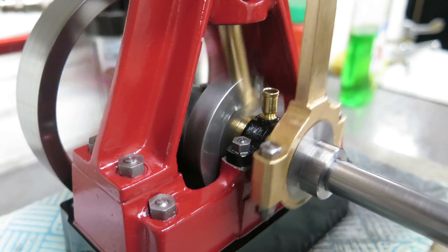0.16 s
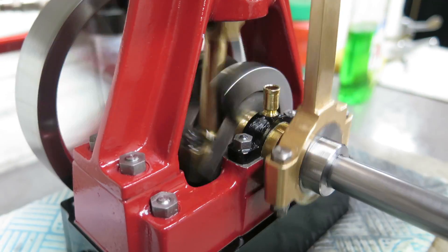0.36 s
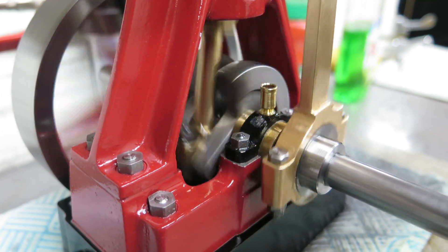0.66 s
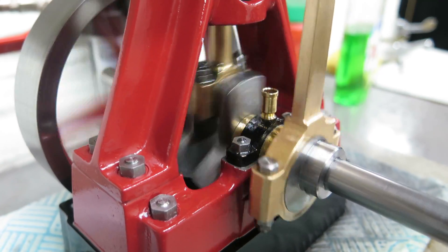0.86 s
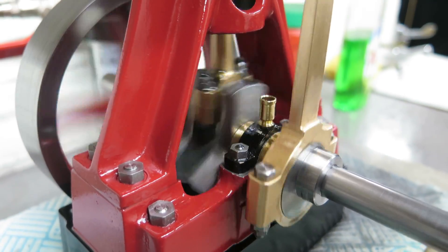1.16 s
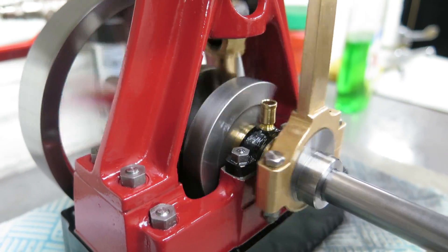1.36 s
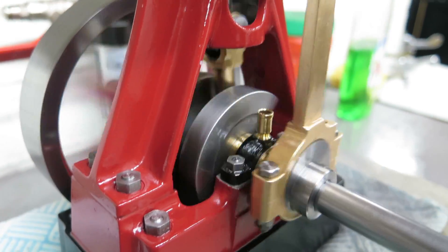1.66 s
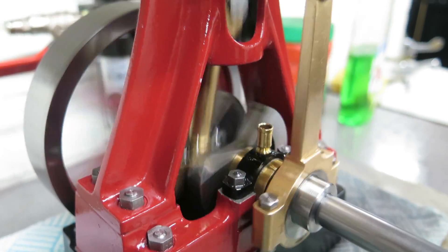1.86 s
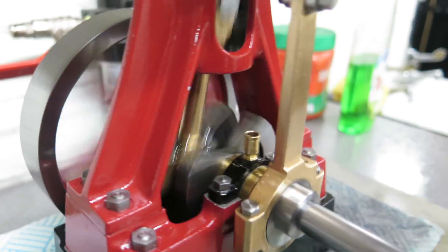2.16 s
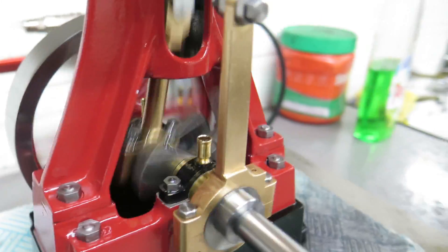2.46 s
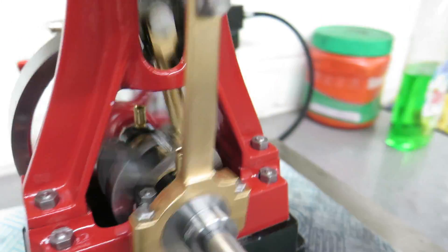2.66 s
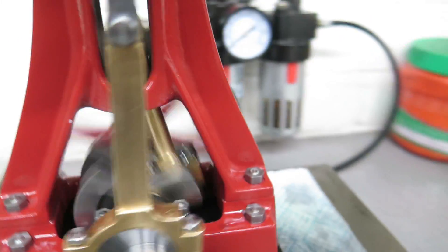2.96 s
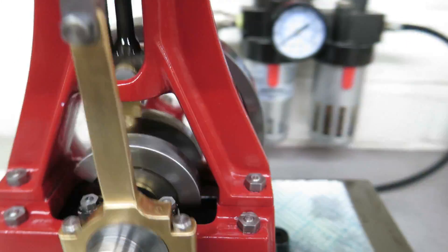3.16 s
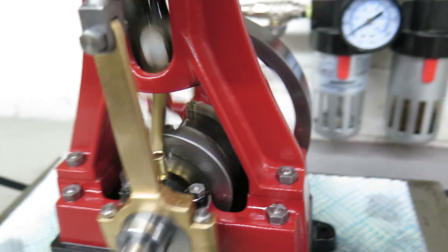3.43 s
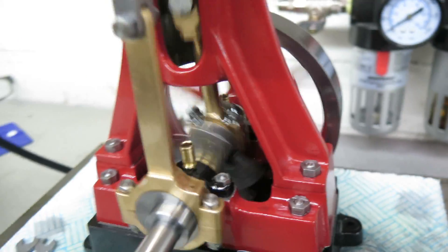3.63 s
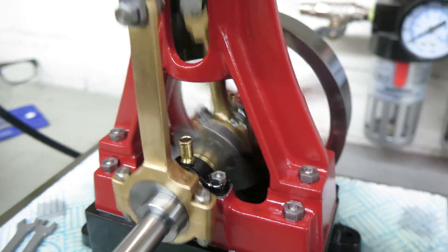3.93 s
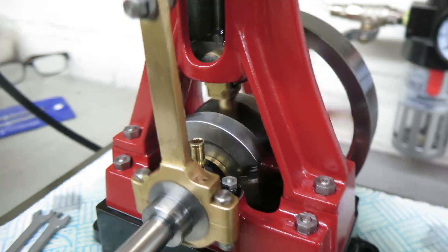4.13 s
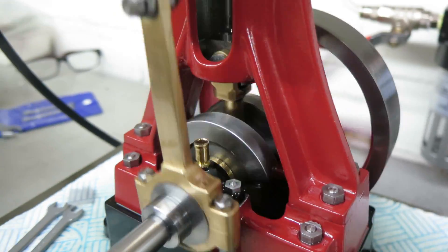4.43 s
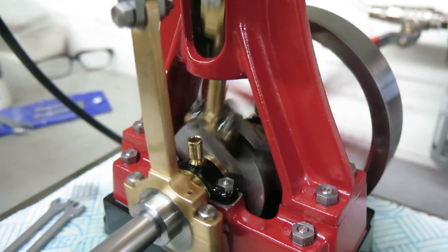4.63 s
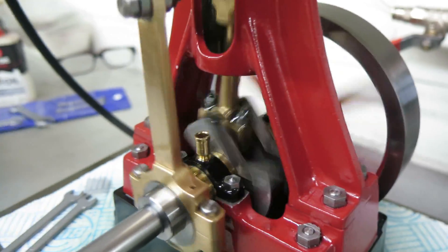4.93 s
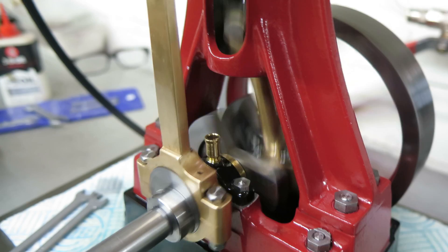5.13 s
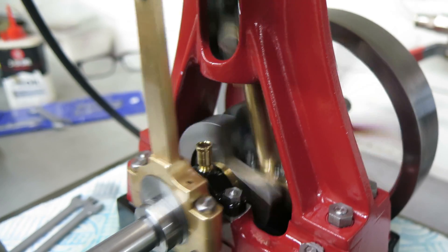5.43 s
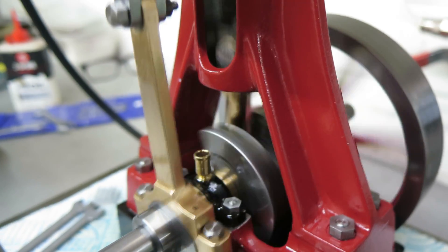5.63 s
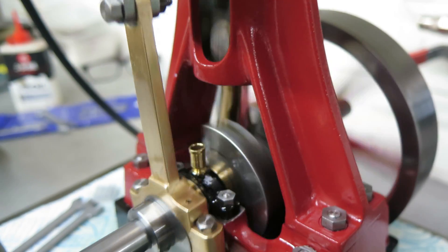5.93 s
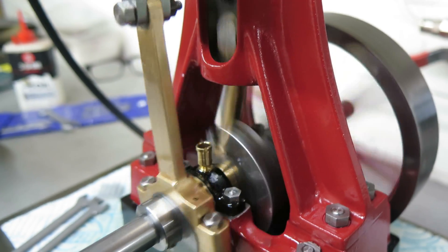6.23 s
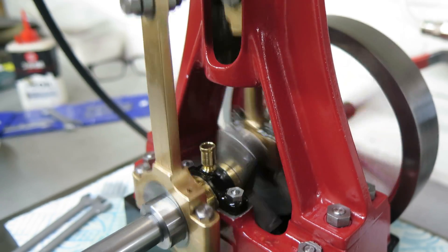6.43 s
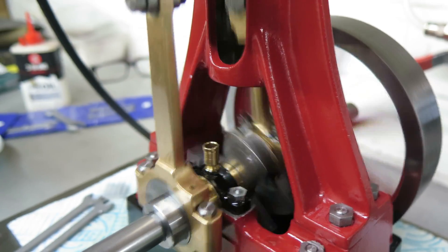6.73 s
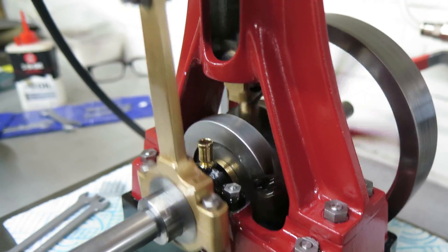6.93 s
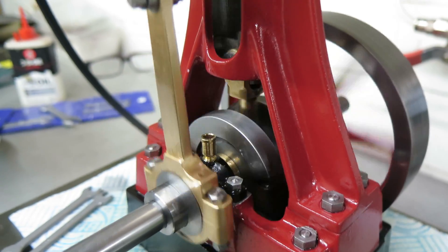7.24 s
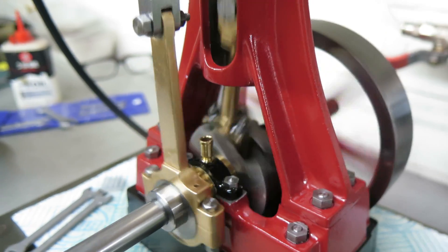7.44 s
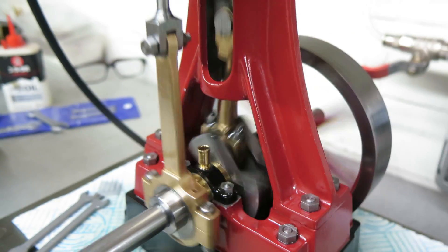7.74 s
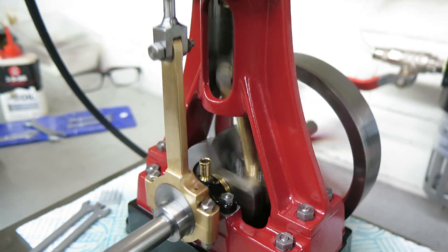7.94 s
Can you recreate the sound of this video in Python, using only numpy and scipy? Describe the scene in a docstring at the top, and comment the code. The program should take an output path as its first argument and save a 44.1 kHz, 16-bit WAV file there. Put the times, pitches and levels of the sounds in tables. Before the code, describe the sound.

Quick, regular chuffing from a little double-acting engine on a bench: hiss, puff, thump, then a softer answer, over and over without stopping. Light metal clatter and ticks ride along, with heavier bearing knocks later. A thin bright air leak and soft room rumble remain constant. Close stereo microphones swing around the machine; distant knocks and a brief low hum belong to the first part, while the second half is nearer and punchier.

```python
"""Workshop bench: a small double-acting steam engine on compressed air, heard close by two moving microphone ports.
Each stroke's spent air hisses (noise through the exhaust resonances), ending in a noise-burst puff and a
thump (low modes pushed twice). The crank bearing and linkage strike frame modes, with noise ticks; the valve rod clicks.
Behind: a steady supply leak (resonant noise), dull knocks further off, a wavering low hum and
workshop rumble (noise bands). Gain control and treble loss act on the sum."""
import sys
import numpy as np
from scipy import signal
from scipy.fft import rfft, irfft, next_fast_len
from scipy.io import wavfile
from scipy.ndimage import uniform_filter1d

SR = 44100
rng = np.random.default_rng(int(sys.argv[2]) if len(sys.argv) > 2 else 0)


def persist_wave(psi):
    """Save psi, clipped to +-1, as 16-bit WAV."""
    counts = np.round(np.clip(psi, -1, 1) * 32767).astype(np.int16)
    wavfile.write(sys.argv[1], SR, np.atleast_2d(counts).T)


N = 356971

# Levels in dB are relative unless stated; several contributions add up.
# Workshop rumble spectrum. Each row: frequency in Hz, density in dB per Hz.
RUMBLE_SPECTRUM = [(13, -38), (22, -9), (40, -7), (110, -4), (220, -11), (434, -17.5), (533, -17.5),
                   (790, -24), (2070, -28), (3900, -42)]
# Rumble likeness. Each row: frequency in Hz, left-right correlation.
RUMBLE_LIKENESS = [(30, .998), (60, 0.98), (150, 0.97), (350, 0.15), (700, 0.21), (1500, 0.52)]
# Low hum. Each row: time in seconds, frequency in Hz, mean level in dB.
HUM_TRACK = [(1.86, 92.4, -62), (1.9, 88, -30.5), (2.15, 96.8, -40), (2.4, 103.4, -39), (2.7, 106.4, -33.5),
             (2.9, 105.5, -43), (3.3, 108, -43)]
# Supply leak resonances. Each row: frequency in Hz, width in Hz, level in dB.
LEAK_RESONANCES = [(2730, 600, -26), (4280, 1760, 4.5), (7270, 1340, 5), (9880, 260, 11), (10940, 140, 15),
                   (12450, 3500, 5.5), (14670, 890, 7)]
# Leak level. Each row: time in seconds, mean level in dB.
LEAK_LEVEL_TRACK = [(0, -42.5), (2.8, -43), (3.4, -38), (4.1, -42), (4.6, -42), (8.1, -42.5)]
# Far knocks. Each row: time in seconds, level in dB.
FAR_KNOCK_EVENTS = [(0.475, -31.5), (0.733, -30.5), (0.973, -31.5), (1.32, -30.5), (1.621, -29.5),
                    (1.917, -31.5), (2.202, -29), (2.474, -30), (2.748, -28.5)]
# Hollow body knocked far off. Each row: frequency in Hz, width in Hz, level in dB.
FAR_BODY_RESONANCES = [(191, 75, 6), (363, 100, -3.5), (551, 48, 0.5), (755, 43, 1.5), (912, 36, -4.5)]
# Crank at the upper end of stroke, speed wandering. Each row: time in seconds, turns made.
CRANK_TURNS = [(.0447, 0), (1.2872, 4), (2.214, 7), (3.4567, 11), (4.7024, 15), (5.3284, 17), (6.26, 20),
               (7.1937, 23), (8.131, 26)]
# Exhaust as the ports come nearer. Each row: time in seconds, upper hiss in dB, upper puff over hiss in dB.
NEARNESS_TRACK = [(0, -31, 8), (1, -32, 7.5), (1.6, -33, 8.5), (2.2, -35, 8.5), (2.85, -33.5, 10),
                  (3.15, -30, 12.5), (3.45, -26, 11.5), (4.1, -27, 12), (4.7, -25, 10.5), (5.9, -23, 11.5),
                  (7.2, -24, 11), (8.1, -26.5, 7.5)]
# Extra take-ups of crank bearing slack, some mostly knock, some mostly tick, added to the every-turn ones.
# Each row: time in seconds, knock in dB, tick in dB.
SLACK_EVENTS = [(0.198, -51, -25), (1.748, -34, -25.5), (3.299, -35, -32), (3.612, -28, -27),
                (4.546, -26, -27), (5.48, -19, -28), (5.791, -26, -44.5), (6.102, -27, -38),
                (6.723, -19.5, -43), (7.036, -35, -44), (7.347, -22, -30), (7.973, -39, -19)]
# Lighter linkage contacts, every turn. Each row: mean lag from the upper end in seconds, level in dB.
LINKAGE_CONTACTS = [(-.028, -34), (.095, -40), (.113, -31)]
# Frame modes. Each row: frequency in Hz, level in dB, t60 in seconds.
FRAME_MODES = [(409, 3, 0.034), (510, 3.5, 0.072), (547, 0.5, 0.053)]
# Valve rod modes. Each row: frequency in Hz, level in dB, t60 in seconds.
VALVE_MODES = [(1470, -1.5, 0.0068), (3460, -2.5, .006)]
# Pipe and bench modes. Each row: frequency in Hz, level in dB, t60 in seconds.
BENCH_MODES = [(61.3, -28, 0.069), (100.4, -1.5, 0.11), (139.6, 2.5, 0.099)]
# Air column pushes at each end. Each row: lag from the end in seconds, level in dB, length in seconds.
AIR_PUSHES = [(-.008, -3, .007), (.0058, 0, .006)]
# Exhaust passage resonances. Each row: frequency in Hz, width in Hz, upper hiss, lower hiss, puff in dB.
PASSAGE_RESONANCES = [(515, 126, -7, -5, -12), (1266, 537, -4, -2.5, -4.5), (1408, 296, 4, 2, -0.5),
                      (1582, 500, -5.5, -6, -10), (2731, 142, -0.5, 5, 0.5),
                      (3280, 280, -12.5, -5.5, -13.5), (4318, 256, -6.5, -3.5, -3),
                      (5032, 86, -0.5, 3.5, 4), (5750, 790, -21, -13, -11.5), (6978, 89, -3.5, 0, 3.5),
                      (8350, 1600, -16, -11.5, -8.5), (9130, 285, -3.5, 0.5, 4.5), (11220, 750, -8, -4, 8),
                      (12970, 1600, -26, -9, -1), (12900, 170, -13, -6, -59), (13900, 2600, -24, -92, -7)]
# Exhaust port, upper row then lower. Each row: opening in seconds before the end,
# full flow in seconds before the end, sag in dB at SAG_S after full flow.
PORT_TIMING = [(.107, 0.053, 2.5), (.132, 0.077, 7.5)]
# Cylinder resonances, rising as the piston sweeps it empty. Each row: end (0 upper, 1 lower),
# first frequency in Hz, last frequency in Hz, width in Hz, level over the flow in dB.
CYLINDER_RESONANCES = [(0, 5400, 6150, 120, -15), (0, 7950, 8400, 150, -21), (1, 1500, 1780, 80, -8),
                       (1, 5250, 5800, 120, -16)]
# Where the ports point. Each row: time in seconds, treble in dB, exhaust left-right in dB,
# low ring lift in dB, middle ring lift in dB.
PORT_VIEW = [(0, -9.5, 0, 3.5, 5), (2.399, -0.5, -0.5, 6.5, 7.5), (2.9, -5, -2.5, -6, 11),
             (3.6, -5.5, -0.5, -2.5, 6.5), (4.202, -5, -1.5, -1.5, 3.5), (5.5, -7.5, -2, -3, 3),
             (8.1, -5.5, -1.5, -6, 1)]
# Phase between the ports. Each row: frequency in Hz, left's lead in radians (negative: lags).
PHASE_LEAD = [(0, 0), (5500, -.75), (7500, -2.3), (16000, -2.6)]

RUMBLE_RMS_DB = -35.5
LEAK_SWING_DB, LEAK_LEAST_TURN = 2, 0.3  # less hiss while little air is drawn, twice a turn
RATTLE_PER_S = 600  # mean contact rate within a far knock
LOWER_AFTER_UPPER_S = 0.162  # upper end of stroke to the lower
LOWER_HISS_DB, LOWER_PUFF_DB, LOWER_THUMP_DB = -6, -4.5, -4.5  # re upper hiss, upper hiss, upper thump
THUMP_DB, THUMP_FOLLOWS = -25, 0.81  # at mean nearness; share of the hiss's dB swing
SLACK_BEFORE_LOWER_S, SLACK_KNOCK_DB, SLACK_TICK_DB = 0.00932, -6.5, -42  # every turn; knock re upper hiss
VALVE_DB, LINKAGE_JITTER_S = -29, 0.0061
SWEEP_S = 0.105  # cylinder pitch rise, ending with the stroke
SAG_S = 0.05  # flow sag grows with time squared
SWIRL_DB, SWIRL_PER_S = 2.0, 25  # spread and rate of each hiss resonance's wander
OPENING_POWER, SHUT_BEFORE_END_S, SHUT_S = 1.25, 0.0072, 0.01  # port flow rise exponent; closing
PUFF_RISE_S, PUFF_RISE_POWER, PUFF_T60_S = 0.0094, 1.42, 0.039
PUFF_TAIL_DB, PUFF_TAIL_T60_S = -13, 0.13
MIC_DROOP_HZ, CUTOFF_HZ = 14900, 16200
DUCK_ABOVE_DB, DUCK_RATIO = -16, 0.58  # threshold; share of the excess taken off
HELD_FALL_DB_PER_S = 49  # fall of the held level that sets the ducking


def amp(db):
    """Decibels to amplitude."""
    return 10 ** (np.asarray(db) / 20)


def rms_one(x):
    """Scale to RMS 1."""
    return x / np.sqrt(np.mean(x ** 2) + 1e-20)


def at_hz(points, hz):
    """Interpolate (Hz, value) rows over log frequency."""
    points_hz, values = np.transpose(points)
    return np.interp(np.log(hz), np.log(np.maximum(points_hz, 1)), values)


def drift(rate_hz):
    """Noise through two equal real poles at rate_hz, RMS 1."""
    r = np.exp(-2 * np.pi * rate_hz / SR)
    settled = signal.lfilter([1], [1, -2 * r, r * r], rng.standard_normal(N + SR))[SR:]
    return rms_one(settled)


def resonate(x, resonances):
    """Parallel resonances (Hz, width Hz, dB), signs alternating."""
    out = 0
    for k, (hz, width_hz, db) in enumerate(resonances):
        r = np.exp(-np.pi * width_hz / SR)
        zeros = [(1 - r * r) / 2, 0, (r * r - 1) / 2]
        poles = [1, -2 * r * np.cos(2 * np.pi * hz / SR), r * r]
        out = out + (-1) ** k * amp(db) * signal.lfilter(zeros, poles, x + 1e-18)
    return out


def strike(times_s, levels_db, modes, contact_s, spread_db):
    """Blows softened by a unit-area contact ring decaying modes (Hz, dB, t60 s), each at a random strength."""
    out = np.zeros(N)
    at = np.minimum((np.asarray(times_s) * SR).astype(int), N - 1)
    scatter = rng.standard_normal((len(at), len(modes)))
    for k, (hz, db, t60_s) in enumerate(modes):
        clicks = np.zeros(N)
        np.add.at(clicks, at, amp(levels_db + db + spread_db * scatter[:, k]))
        r, w = amp(-60 / (t60_s * SR)), 2 * np.pi * hz / SR
        out += signal.lfilter([0, np.sin(w)], [1, -2 * r * np.cos(w), r * r], clicks + 1e-18)
    contact = np.hanning(int(contact_s * SR) + 3)
    return signal.fftconvolve(out, contact / contact.sum())[:N]


def repeat(times_s, levels_db, shape_s, shape_db):
    """Lay one envelope at every time; overlaps add."""
    out, t = np.zeros(N), np.arange(N) / SR
    for s, db in zip(times_s, levels_db):
        near = slice(max(int((s + shape_s[0]) * SR), 0), int((s + shape_s[-1]) * SR))
        out[near] += amp(db + np.interp(t[near] - s, shape_s, shape_db))
    return out


def ports(x, apart_db):
    """Two ports hear row 0 alike and row 1 in opposite sign; left lags and is shaded, more in the treble."""
    size = next_fast_len(N)
    hz = np.fft.rfftfreq(size, 1 / SR)
    half_lead = np.exp(.5j * np.interp(hz, *np.transpose(PHASE_LEAD)))
    turn = half_lead * amp(-hz / 10000)
    left = x[0] + amp(apart_db) * x[1]
    right = x[0] - amp(apart_db) * x[1]
    return np.array([irfft(rfft(left, size) * turn, size), irfft(rfft(right, size) / turn, size)])[:, :N]


def rumble():
    """Half-octave noise bands, each with its own level, slow lumps and left-right correlation."""
    out, edges_hz = 0, 20 * 2 ** np.arange(0, 7.6, .5)
    white = rng.standard_normal((2, 2, N))
    for k, (low_hz, high_hz) in enumerate(zip(edges_hz, edges_hz[1:])):
        band = signal.butter(2, [low_hz, high_hz], "band", fs=SR, output="sos")
        mid, side = signal.sosfilt(band, white[k % 2])  # neighbouring bands use separate noise
        hz = np.sqrt(low_hz * high_hz)
        alike = np.clip(at_hz(RUMBLE_LIKENESS, hz), 0, 1)
        gain = amp(at_hz(RUMBLE_SPECTRUM, hz) + 1.5 * drift(6))
        out = out + gain * (np.sqrt(1 + alike) * mid + np.sqrt(1 - alike) * side * [[1], [-1]])
    return amp(RUMBLE_RMS_DB) * rms_one(out)


def hum():
    """One sine, gliding in pitch and wavering in level."""
    s, hz, db = np.transpose(HUM_TRACK)
    t = np.arange(N) / SR
    level_db = np.interp(t, s, db, -99, -99) + 2.1 * drift(9.9)
    phase = 2 * np.pi * np.cumsum(np.interp(t, s, hz)) / SR
    return np.sqrt(2) * amp(level_db) * np.sin(phase)


def leak():
    """Escaping supply air: resonant noise, its level breathing twice per crank turn."""
    hiss = rms_one(resonate(rng.standard_normal((2, N)), LEAK_RESONANCES))
    t = np.arange(N) / SR
    turns = np.interp(t, *np.transpose(CRANK_TURNS))
    swing = -np.cos(4 * np.pi * (turns - LEAK_LEAST_TURN))
    level_db = np.interp(t, *np.transpose(LEAK_LEVEL_TRACK)) + LEAK_SWING_DB * swing
    return amp(level_db) * ports(hiss, apart_db=-8)


def far_knocks():
    """Hollow body excited by a short rattle of contacts and a room blur that differs on each side."""
    s, db = np.transpose(FAR_KNOCK_EVENTS)
    shared, own = rng.standard_normal((2, N))
    contacts = rms_one(rng.choice([-1, 1], N) * (rng.random(N) < RATTLE_PER_S / SR))
    rattle = repeat(s, db + 15.0, [-.009, -0.0071, 0.0076, 0.016], [-25, -4, 1.5, -25]) * contacts
    blur_envelope = repeat(s, db + 10.5, [-0.0053, 0.0098, 0.043, 0.14], [-20, 0.5, -6.5, -29])
    blur = blur_envelope * (shared + 0.31 * own * [[1], [-1]])
    bare = signal.sosfilt(signal.butter(2, [250, 1400], "band", fs=SR, output="sos"), rattle)
    return amp(-22) * bare + resonate(rattle + blur, FAR_BODY_RESONANCES)


def strokes():
    """Crank timing gives stroke ends, upper and lower in turn: rows of time s, thump, puff and hiss dB."""
    crank_s, turns = np.transpose(CRANK_TURNS)
    upper_s = np.interp(np.arange(turns[-1] + 1), turns, crank_s)
    s = np.transpose([upper_s, upper_s + LOWER_AFTER_UPPER_S]).ravel()[:-1]
    lower = np.arange(len(s)) % 2
    near_s, level_db, over_db = np.transpose(NEARNESS_TRACK)
    hiss_db = np.interp(s, near_s, level_db)
    thump_db = THUMP_DB + THUMP_FOLLOWS * (hiss_db - hiss_db.mean()) + lower * LOWER_THUMP_DB
    puff_db = hiss_db + np.where(lower, LOWER_PUFF_DB, np.interp(s, near_s, over_db))
    return np.array([s, thump_db, puff_db, hiss_db + lower * LOWER_HISS_DB])


def linkage():
    """Slack and linkage blows ring the frame; slack adds noise ticks, the valve rod clicks."""
    ends_s, _, _, hiss_db = strokes()
    upper_s, lower_s = ends_s[::2], ends_s[1::2]
    extra_s, extra_db, extra_tick_db = np.transpose(SLACK_EVENTS)
    s = np.r_[extra_s, lower_s - SLACK_BEFORE_LOWER_S]
    knock_db = np.r_[extra_db, hiss_db[:-1:2] + SLACK_KNOCK_DB]
    tick_db = np.r_[extra_tick_db, SLACK_TICK_DB + 2.5 * rng.standard_normal(len(lower_s))]
    out = strike(s, knock_db - 2.0, FRAME_MODES, contact_s=0.0018, spread_db=2.5)
    for lag_s, db in LINKAGE_CONTACTS:
        contact_at_s = upper_s + lag_s + LINKAGE_JITTER_S * rng.standard_normal(len(upper_s))
        out += strike(np.maximum(contact_at_s, 0), db, FRAME_MODES, contact_s=0.0022, spread_db=2.5)
    out += strike(lower_s + 0.0077, VALVE_DB, VALVE_MODES, contact_s=.0001, spread_db=3.5)
    tick_envelope = repeat(s, tick_db + 8.5, [0, .0004, .004], [-20, 0, -30])
    ticks = tick_envelope * rng.standard_normal((2, N))
    bright = signal.sosfilt(signal.butter(2, 5500, "high", fs=SR, output="sos"), ticks)
    return out + ports(bright, apart_db=-10)


def thumps():
    """Two suction pushes at each end of stroke but the last ring the low pipe and bench modes."""
    s, thump_db = strokes()[:2, :-1]
    out = 0
    for lag_s, db, length_s in AIR_PUSHES:
        out = out - strike(s + lag_s, thump_db + db + 5.5, BENCH_MODES, length_s, spread_db=3.5)
    return out


def port_flow(end):
    """Port opens, flow sags as the cylinder empties, port shuts: (s from the end, dB)."""
    opens_s, full_s, sag_db = PORT_TIMING[end]
    t = np.arange(-opens_s, SHUT_S / 2 - SHUT_BEFORE_END_S, 1 / 2000)
    opening = np.clip((t + opens_s) / (opens_s - full_s), 1e-2, 1)
    rise_db = 20 * OPENING_POWER * np.log10(opening)
    shut_db = 20 * np.log10(np.clip(.5 - (t + SHUT_BEFORE_END_S) / SHUT_S, 1e-2, 1))
    return t, rise_db - sag_db * (np.maximum(t + full_s, 0) / SAG_S) ** 2 + shut_db


def puff_shape():
    """Steep swell, quick fall and a weaker, longer tail: (s from the end, dB)."""
    t = np.arange(-PUFF_RISE_S, PUFF_TAIL_T60_S, 1 / 4000)
    after = np.maximum(t, 0)
    fall = amp(-60 * after / PUFF_T60_S) + amp(PUFF_TAIL_DB - 60 * after / PUFF_TAIL_T60_S)
    rise = np.clip(1 + t / PUFF_RISE_S, 1e-2, 1) ** PUFF_RISE_POWER
    return t, 20 * np.log10(rise * fall)


def swirling(x, resonances):
    """Parallel resonances whose strengths wander independently."""
    t, out = np.arange(N) / SR, 0
    knots_s = np.arange(0, N / SR + 1, 1 / SWIRL_PER_S)
    wander = rng.standard_normal((len(resonances), len(knots_s)))
    for k, resonance in enumerate(resonances):
        gain = amp(SWIRL_DB * np.interp(t, knots_s, wander[k]))
        out = out + (-1) ** k * gain * resonate(x, [resonance])
    return out


def cylinder(end, flow):
    """Emptying cylinder: narrow noise shifted to a rising pitch, one band per resonance of that end."""
    t, ends_s, out = np.arange(N) / SR, strokes()[0, end::2], 0
    to_go_s = ends_s[np.minimum(np.searchsorted(ends_s, t), len(ends_s) - 1)] - t
    swept = np.clip(1 - to_go_s / SWEEP_S, 0, 1)
    for at_end, first_hz, last_hz, width_hz, db in CYLINDER_RESONANCES:
        if round(at_end) == end:
            carrier = np.exp(2j * np.pi * np.cumsum(first_hz + (last_hz - first_hz) * swept) / SR)
            r = np.exp(-np.pi * width_hz / SR)
            white = rng.standard_normal((2, N)) + 1j * rng.standard_normal((2, N))
            slow = signal.lfilter([1], [1, -r], white)
            out = out + amp(db) * flow * rms_one((slow * carrier).real)
    return out


def viewed(x):
    """The frame shades parts of the exhaust as the ports move round: treble, two rings and balance."""
    view_s, *columns = np.transpose(PORT_VIEW)
    treble_db, pan_db, low_db, mid_db = (np.interp(np.arange(N) / SR, view_s, c) for c in columns)
    treble = signal.sosfilt(signal.butter(1, 4000, "high", fs=SR, output="sos"), x)
    x = x + (amp(treble_db) - 1) * treble
    low_lift = (amp(low_db) - 1) * resonate(x, [(1389, 170, 0)])
    mid_lift = (amp(mid_db) - 1) * resonate(x, [(2660, 330, 0)])
    return ports(x + low_lift + mid_lift, apart_db=-11) * amp([pan_db / 2, -pan_db / 2])


def exhaust():
    """Turbulent air through the passages: a long hiss each stroke, a spluttering puff at its end."""
    s, _, puff_db, hiss_db = strokes()
    passages = np.array(PASSAGE_RESONANCES)
    low = passages[:, 0] < 3800
    white, out = rng.standard_normal((3, 2, N)), 0
    for end in (0, 1):
        shape_s, shape_db = port_flow(end)
        flutter = amp(1.5 * drift(90))
        flow = repeat(s[end::2], hiss_db[end::2], shape_s, shape_db) * flutter
        # treble needs fast flow: comes later, goes sooner
        fast_flow = repeat(s[end::2], hiss_db[end::2], shape_s, 1.8 * shape_db) * flutter
        hiss_modes = passages[:, [0, 1, 2 + end]]
        out = out + amp(10.0) * swirling(flow * white[end], hiss_modes[low])
        out = out + cylinder(end, flow)
        out = out + amp(15.5) * swirling(fast_flow * white[end], hiss_modes[~low])
    burst = repeat(s, puff_db, *puff_shape()) * amp(0.6 * drift(490))
    out = out + amp(9.0) * resonate(burst * white[2], passages[:, [0, 1, 4]])
    return viewed(out)


def scene():
    """Sum of all sources, background first."""
    return rumble() + hum() + leak() + far_knocks() + linkage() + thumps() + exhaust()


def record(dry):
    """Treble droop, gain control ducking on loud levels and recovering, rounded peaks, steep top cut."""
    dry = signal.sosfilt(signal.butter(4, MIC_DROOP_HZ, fs=SR, output="sos"), dry)
    power = uniform_filter1d(np.mean(dry ** 2, axis=0), size=220)
    level_db = 10 * np.log10(power + 1e-9)
    ramp_db = HELD_FALL_DB_PER_S * np.arange(N) / SR
    held_db = np.maximum.accumulate(level_db + ramp_db) - ramp_db
    duck_db = uniform_filter1d(DUCK_RATIO * np.maximum(held_db - DUCK_ABOVE_DB, 0), size=200)
    rounded = np.tanh(dry * amp(-duck_db))
    return signal.sosfilt(signal.cheby2(12, 60, CUTOFF_HZ, fs=SR, output="sos"), rounded)


dry = scene()
out = record(dry)
persist_wave(out)
```